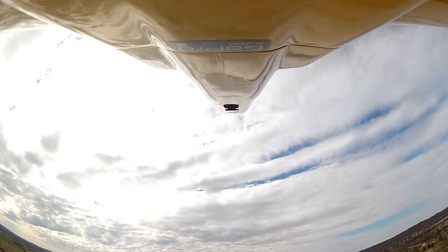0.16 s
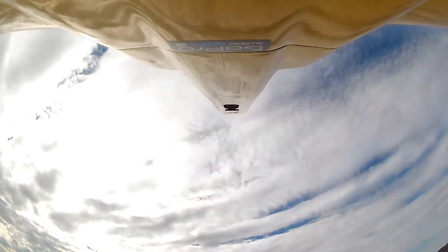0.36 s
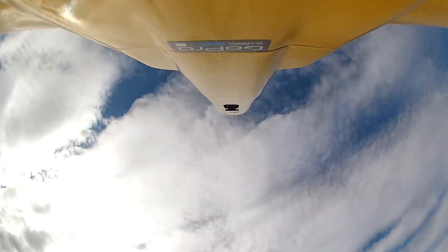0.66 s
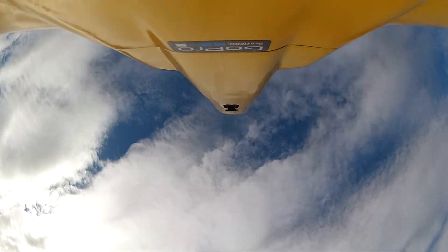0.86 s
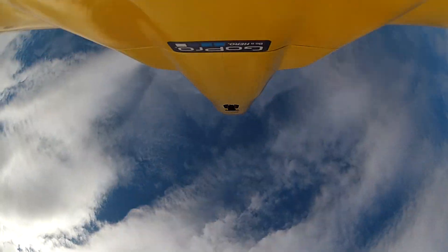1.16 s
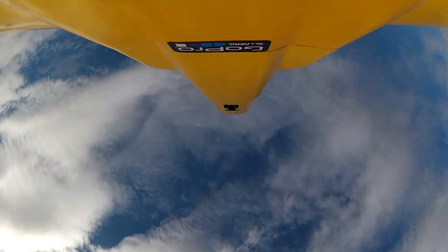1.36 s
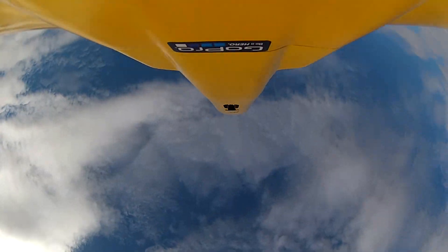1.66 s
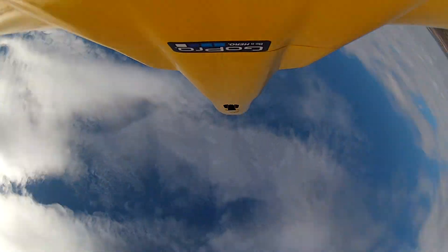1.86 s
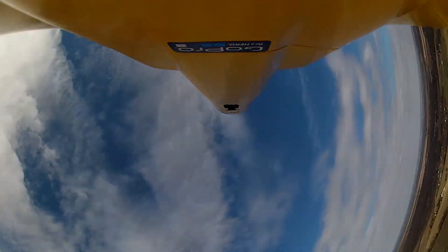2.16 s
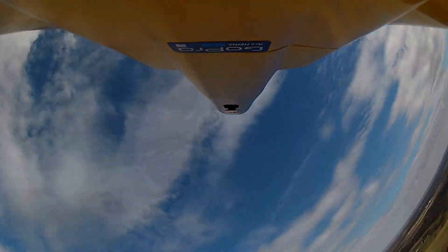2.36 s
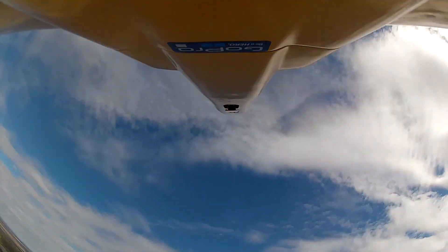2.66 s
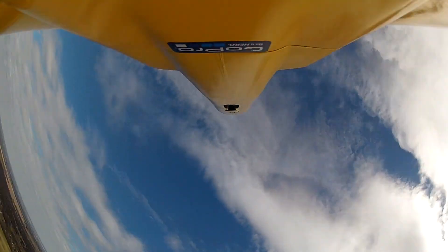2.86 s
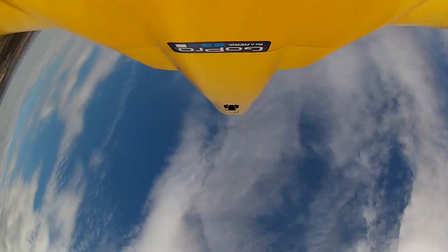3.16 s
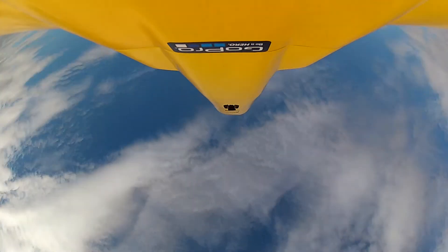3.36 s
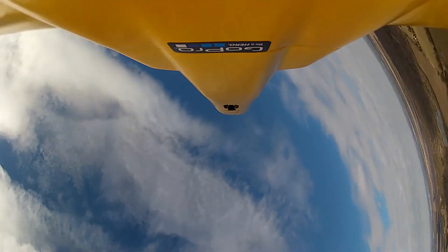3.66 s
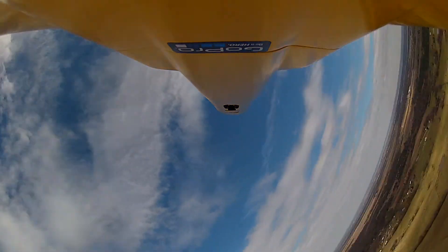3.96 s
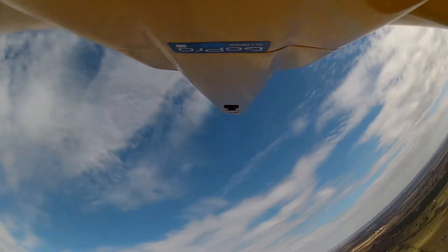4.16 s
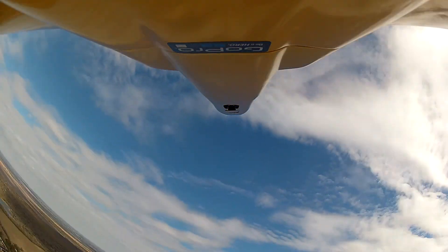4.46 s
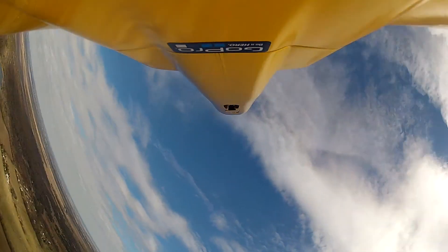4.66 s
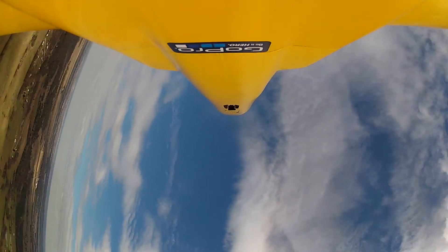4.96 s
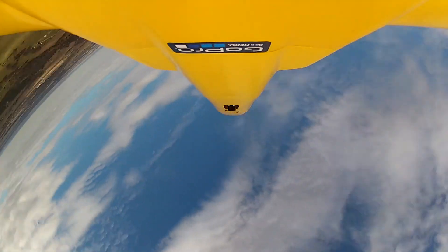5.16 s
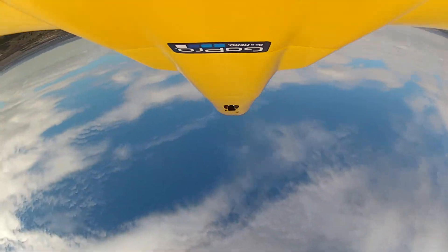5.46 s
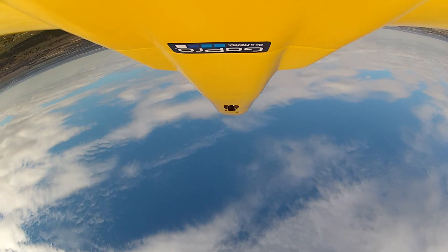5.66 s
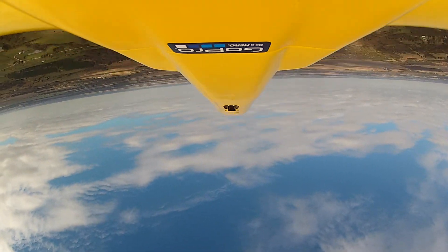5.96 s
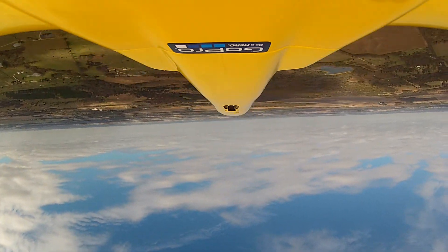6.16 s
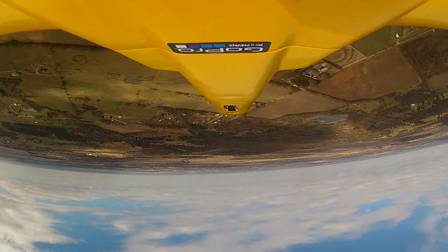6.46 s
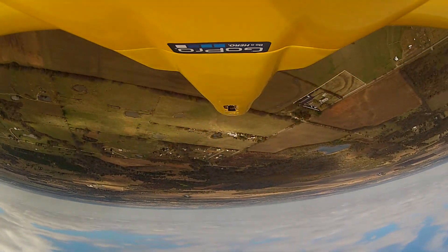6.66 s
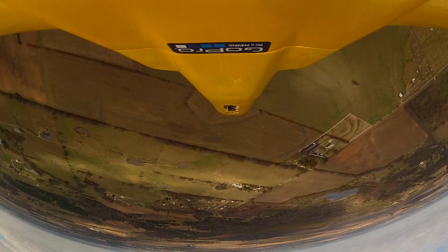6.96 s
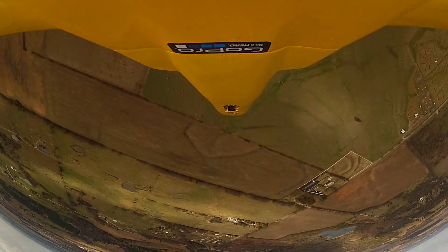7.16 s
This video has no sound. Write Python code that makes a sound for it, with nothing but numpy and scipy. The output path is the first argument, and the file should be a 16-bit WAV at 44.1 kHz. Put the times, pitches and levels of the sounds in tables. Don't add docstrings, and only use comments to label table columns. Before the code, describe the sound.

From 0 s a small jet model climbs, heard from a cased camera fixed to its airframe: a dense, boxy roar of rushing air and exhaust, with a thin, clean turbine whine around 1.8 kHz. Hard gusts knock the case with brief dry slaps, stronger at about 0.3 s and irregular afterward, each tending to make the level dip and recover. Low shaking builds, with a rougher burst around 2.4 s as the aircraft rolls. The whine creeps barely upward and gets clearer until 4.9 s, then glides down for more than a second, wavering in strength, and settles near 1.14 kHz by about 6.5 s. Meanwhile low buffeting thickens and wind stays strong through the dive to 7.3 s. Fluttering turbulence and gritty, metallic high fizz colour everything; it is close, with no echo, and ends still in flight.

```python
import sys
import numpy as np
from scipy import signal
from scipy.fft import irfft, next_fast_len
from scipy.io import wavfile
from scipy.ndimage import uniform_filter1d

SR = 44100
rng = np.random.default_rng(int(sys.argv[2]) if len(sys.argv) > 2 else 0)


def undo_db(level):
    steps = np.asarray(level, float) / 20
    return 10 ** steps


def unload_wav(signal):
    wavfile.write(
        sys.argv[1],
        SR,
        np.round(np.clip(np.atleast_2d(signal).T, -1, 1) * 32767).astype(np.int16),
    )


N = 322371
T = np.arange(N) / SR
HZ = np.fft.rfftfreq(next_fast_len(N), 1 / SR)

# [t/s of the abrupt end, slap level/dB, slap f/Hz, gain duck/dB]
GUST_HITS = [(.271, -8, 2450, 5.5), (.661, -15, 2450, 1), (1.114, -13, 2450, 1.5), (1.879, -20, 2570, 3.5),
             (2.019, -12, 2480, 3.8), (2.3, -20, 2390, 1.5), (2.367, -12, 2400, 0.7), (2.826, -18, 2420, 0),
             (3.085, -46, 2450, 1), (3.353, -13, 1170, 1), (3.66, -20, 1780, 2.5), (3.861, -13, 2440, 2.5),
             (4.185, -29, 2370, 2.2), (4.446, -13, 2380, 3.5), (4.955, -13, 1240, -0.5),
             (5.126, -19, 2000, 2), (5.661, -29, 2410, 0.3), (6.235, -27, 1200, 2), (6.886, -26, 2420, 1.2),
             (7.172, -21, 2400, 0.5)]


def evened(x):
    return x / np.sqrt(np.mean(x ** 2) + 1e-20)


def noise(shape):
    spectrum = rng.standard_normal(len(HZ)) + 1j * rng.standard_normal(len(HZ))
    return irfft(shape * spectrum)[:N]


def peak(hz, centre_hz, width_hz):
    return 1 / (1 + (1.3 * (hz - centre_hz) / width_hz) ** 2)


def wander(top_hz):
    return evened(noise((HZ > 2.5) / np.sqrt(HZ + 1) / (1 + (HZ / top_hz) ** 2)))


def shaft_hz():
    # [t/s, f/Hz]
    full_speed = [(0.0, 1811.2), (0.35, 1811.8), (1.8, 1827.7), (2.35, 1825.4), (3.9, 1833.5),
                  (4.5, 1830.5)]
    cut_s, settle_s, inertia_s = 4.855, 0.405, 0.3
    fall_hz_per_s, idle_hz = 675, 1137.5
    full = np.interp(T, *np.transpose(full_speed))
    knee_hz = fall_hz_per_s * settle_s
    knee_s = cut_s + (full[-1] - idle_hz - knee_hz) / fall_hz_per_s
    falling = full - fall_hz_per_s * np.maximum(T - cut_s, 0)
    settling = idle_hz + knee_hz * np.exp(-(T - knee_s) / settle_s)
    speed = np.where(T < knee_s, falling, settling)
    return uniform_filter1d(speed, size=round(inertia_s * SR), mode="nearest")


def turbine():
    # [f/Hz, level/dB]
    whine_path = [(1139, -32.5), (1158, -25), (1300, -41), (1400, -33), (1700, -30.5), (1775, -41),
                  (1808, -28.5), (1832, -23)]
    # [multiple of the shaft speed, level/dB]
    overtones = [(2, -46), (3, -35)]
    start_db, full_s = -7, 5.2
    speed_hz = shaft_hz()
    path_db = np.interp(speed_hz, *np.transpose(whine_path))
    swell_db = start_db * np.maximum(1 - T / full_s, 0)
    hz = speed_hz + 0.81 * wander(top_hz=3.2)
    angle = 2 * np.pi * np.cumsum(hz) / SR
    out = undo_db(path_db + swell_db + 1.15 + 0.62 * wander(top_hz=19)) * np.sin(angle)
    for order, order_db in overtones:
        case = peak(order * hz, centre_hz=3720, width_hz=220)
        out = out + undo_db(order_db) * case * np.sin(order * angle)
    return np.sqrt(2) * out


def slaps():
    out = np.zeros(N)
    u = np.arange(-900, 300) / SR
    swell = np.exp(np.minimum(u, 0) / 0.0042 - np.maximum(u, 0) / 0.00066)
    for s, db, hz, _ in GUST_HITS:
        at = np.minimum(np.round((s + u) * SR).astype(int), N - 1)
        out[at] += undo_db(db) * swell * np.sin(2 * np.pi * hz * u)
    return out


def shaken(modes, drive_db, trim_db, flutter_db):
    mean_db = drive_db.mean()
    rings = [undo_db(db) * noise(peak(HZ, hz, width_hz)) for hz, width_hz, db, _ in modes]
    scale = np.sqrt(sum(np.mean(ring ** 2) for ring in rings))
    moved = sum(ring * undo_db(mode[3] * (drive_db - mean_db)) for ring, mode in zip(rings, modes))
    return undo_db(mean_db + trim_db + flutter_db * wander(top_hz=45)) * moved / scale


def airflow():
    # [f/Hz, width/Hz, level/dB per Hz, share of the drive changes]
    buffet_modes = [(59.4, 10.6, 0.5, 0.5), (108.4, 12, -5, 0.87), (156, 14.2, 0.5, 1.1),
                    (190, 38.5, -2, 0.94), (240, 51, -3, 0.7), (266, 25.4, -3, 0.1), (358, 100, -17, 0.5),
                    (516.3, 41.4, -5, 0.39), (556, 42, -5.5, 0.4), (663, 108, -12, 0.46),
                    (841, 77, -7, 0.55)]
    fuselage_modes = [(990, 210, -14, 0.18), (1193, 103, 2.5, 0.92), (1387, 120, -6.5, 0.16),
                      (1518, 84, -10.5, 1), (1800, 180, -9, 0.93), (1913, 142, -2, 0.62)]
    roar_modes = [(2195, 227, -1.5, 0.32), (2450, 212, 3, 0.87), (2608, 80, 1.5, 0.62),
                  (2940, 270, -8.5, 0.59), (3112, 130, -4.5, 0.32)]
    hiss_modes = [(3607, 214, 0.5, 0.19), (3844, 200, -7, 0.31), (4250, 250, -10, 2.4),
                  (4617, 180, -8, 0.79), (5195, 410, -8.5, 0.56), (5470, 110, -17.5, 1.3),
                  (5850, 510, -8, 1.8)]
    # [f/Hz, level/dB per Hz]
    rush_curve = [(20, -40), (60, -18), (400, -4), (1000, 2), (2000, 7.5), (3500, -8), (6000, -7)]
    # [t/s, turbulence/dB, airspeed/dB]
    flight_path = [(0.0, -9, 2), (0.8, -4, 3), (1.65, -4.5, 1.5), (2.3, -0.5, 2), (3.6, 0.5, -2),
                   (4.0, -1, -2.5), (4.45, -0.5, -2.5), (5.2, 3.5, 0), (5.6, 4.5, 1.5), (6.0, 5, 2),
                   (7.31, 5.5, 1.5)]
    # [level/dB, share of turbulence, share of airspeed, roll burst/dB]
    group_drive = dict(buffet=(-34, 1.21, -0.3, 2.5), fuselage=(-27, 0.75, -0.9, 3.5),
                   roar=(-25, -0.12, 1.1, -1.1), hiss=(-30.5, -0.06, 0.19, 2))
    roll_s, roll_width_s = 2.43, 0.28

    s, *flight = np.transpose(flight_path)
    turbulence_db, airspeed_db = (np.interp(T, s, db) for db in flight)
    burst = np.exp(-0.5 * ((T - roll_s) / roll_width_s) ** 2)
    buffet, fuselage, roar, hiss = (db + shake * turbulence_db + wind * airspeed_db + roll_db * burst
                                    for db, shake, wind, roll_db in group_drive.values())
    f, db = np.transpose(rush_curve)
    rush = evened(noise(undo_db(np.interp(np.log(HZ + 1), np.log(f), db))))
    return (shaken(buffet_modes, buffet, trim_db=1.4, flutter_db=0.93)
            + shaken(fuselage_modes, fuselage, trim_db=2.0, flutter_db=0.53)
            + shaken(roar_modes, roar, trim_db=1.57, flutter_db=0.02)
            + shaken(hiss_modes, hiss, trim_db=1.3, flutter_db=0.4)
            + undo_db(1.5 * (hiss - hiss.mean()) - 33.0) * rush)


def scene():
    gustiness = undo_db(0.25 * wander(top_hz=30))
    return (turbine() + slaps() + airflow() * gustiness)[None]


def thinned(x):
    # [f/Hz, level/dB per bin, rise/dB for each dB of bass]
    weakest_kept = [(2500, -80, .2), (4000, -65.5, .55), (5000, -63, .7), (6100, -65, .25),
                    (7500, -64.5, .7), (9000, -68, .2), (10500, -63.5, 0), (15170, -65, .2)]
    gap_hz, gap_half_hz, gap_edge_hz, gap_db = 12000, 750, 400, 7.5
    top_hz, top_db_per_hz = 15050, 0.04
    frames = dict(window="hann", nperseg=2048, noverlap=1536)
    hz, _, z = signal.stft(x, SR, **frames)
    power = uniform_filter1d(uniform_filter1d(abs(z) ** 2, size=3, axis=1), size=3, axis=2)
    bass = uniform_filter1d(power[:, hz < 330].sum(1), size=60, axis=1)
    bass_db = 10 * np.log10(bass + 1e-20)
    drift = uniform_filter1d(rng.standard_normal(z[:, ::32].shape), size=3, axis=2)
    drift = drift.repeat(32, axis=1)[:, :len(hz)]
    f, db, rise = np.transpose(weakest_kept)
    gap = np.clip(1 - (abs(hz - gap_hz) - gap_half_hz) / gap_edge_hz, 0, 1)
    least_db = np.interp(hz, f, db) + gap_db * gap + top_db_per_hz * np.maximum(hz - top_hz, 0)
    threshold_db = least_db[:, None] + np.outer(np.interp(hz, f, rise), bass_db - bass_db.mean())
    kept = power > undo_db(threshold_db + 2.4 * evened(drift)) ** 2
    return signal.istft(z * kept, SR, **frames)[1][:, :N]


def top_cut(x):
    return signal.sosfilt(signal.butter(12, 16350, fs=SR, output="sos"), x)


def record(dry):
    duck_db = sum(db * (T > s) * np.exp(-abs(T - s) / 0.06) for s, _, _, db in GUST_HITS)
    ducked = dry * undo_db(0.4 - uniform_filter1d(duck_db, size=40))
    limited = ducked / (1 + (abs(ducked) / 0.62) ** 4) ** 0.25
    low_pass = signal.firwin(151, 5850, window=("kaiser", 5.0), fs=SR)
    smooth = signal.oaconvolve(limited, low_pass[None], "same")
    slow = signal.resample_poly(smooth, 40, 147, axis=1, window=("kaiser", 2.0))
    held = np.repeat(slow, 4, axis=1)
    mix = thinned(signal.resample_poly(held, 147, 160, axis=1))
    return top_cut(mix)


dry = scene()
out = record(dry)
unload_wav(out)
```